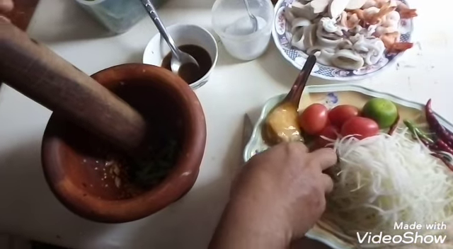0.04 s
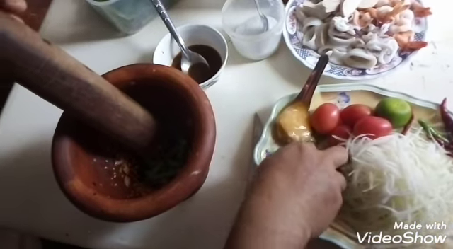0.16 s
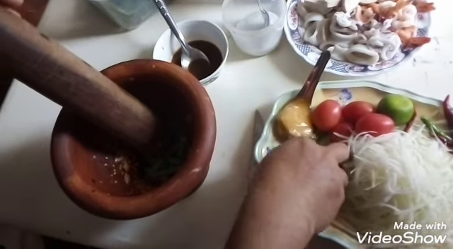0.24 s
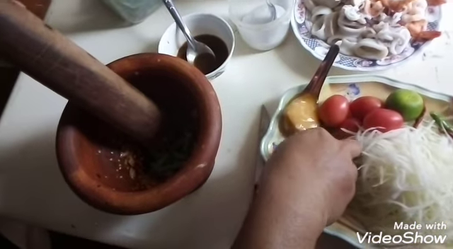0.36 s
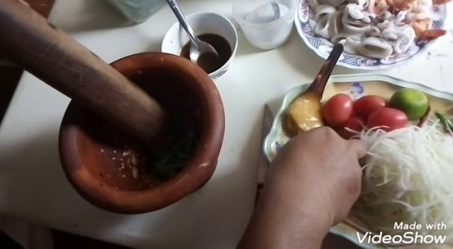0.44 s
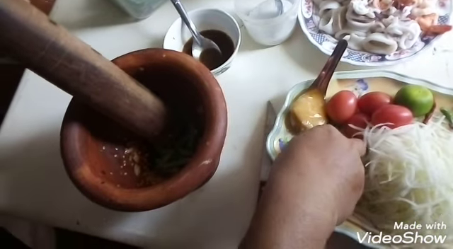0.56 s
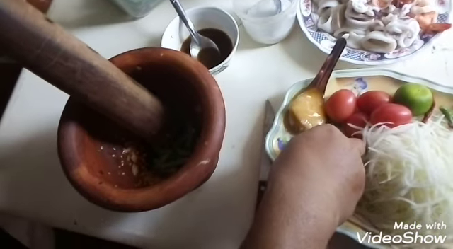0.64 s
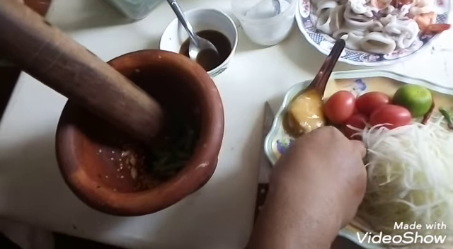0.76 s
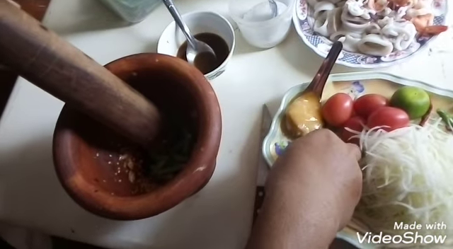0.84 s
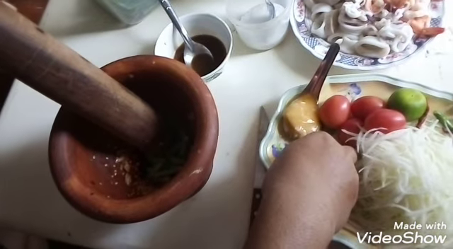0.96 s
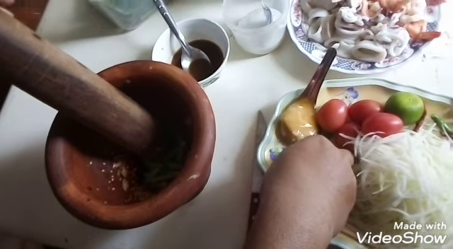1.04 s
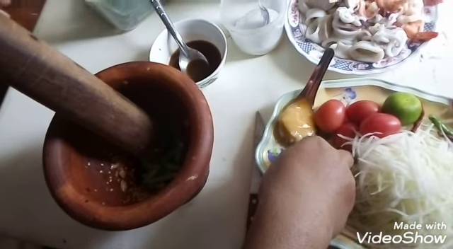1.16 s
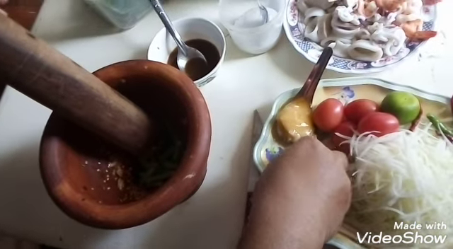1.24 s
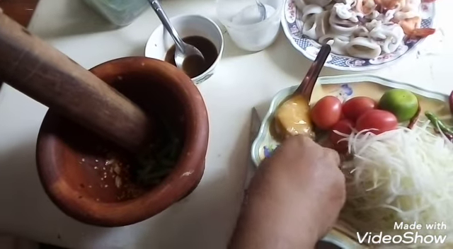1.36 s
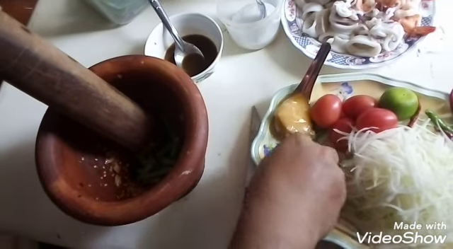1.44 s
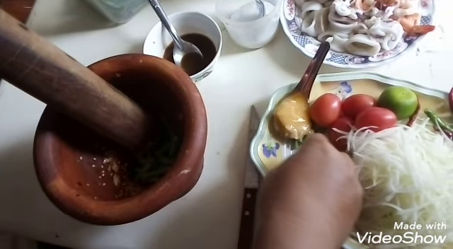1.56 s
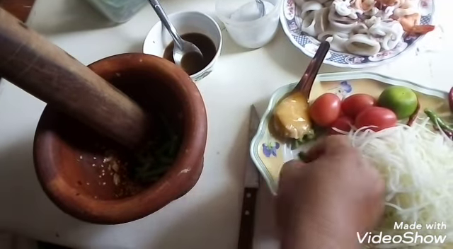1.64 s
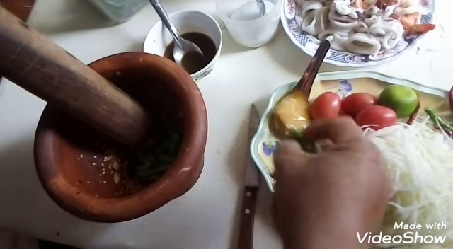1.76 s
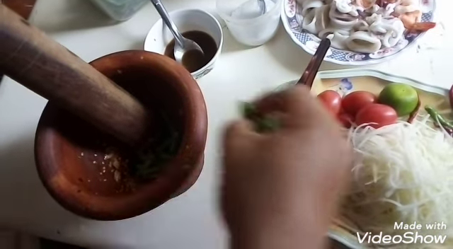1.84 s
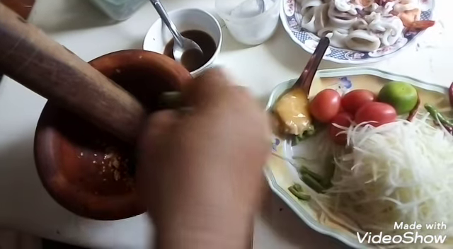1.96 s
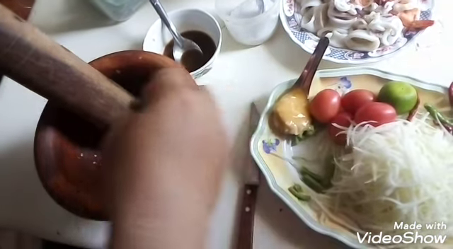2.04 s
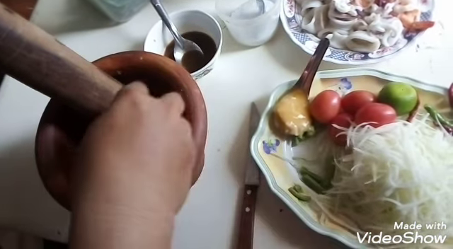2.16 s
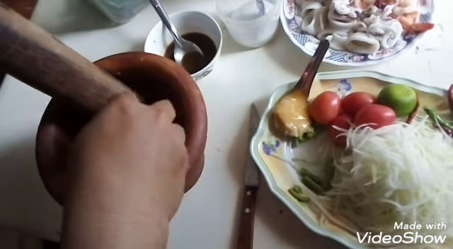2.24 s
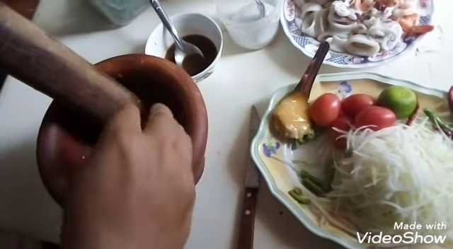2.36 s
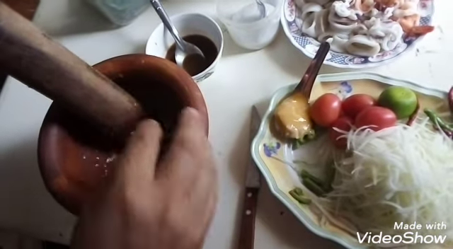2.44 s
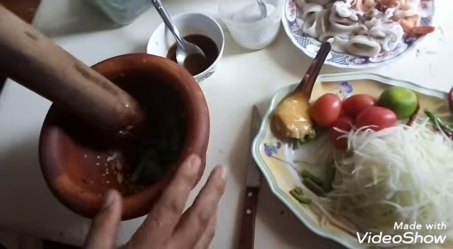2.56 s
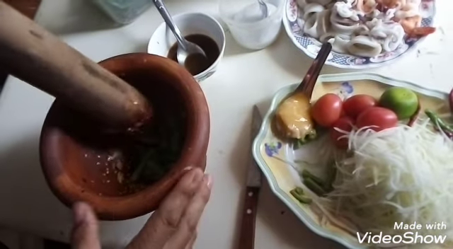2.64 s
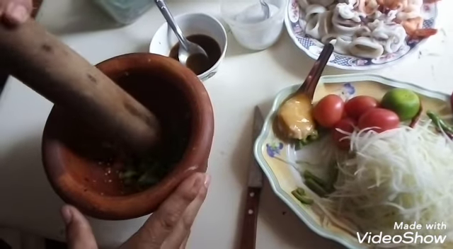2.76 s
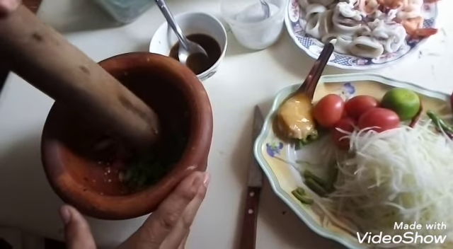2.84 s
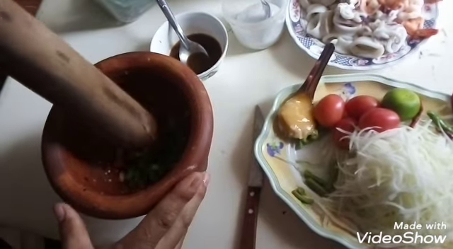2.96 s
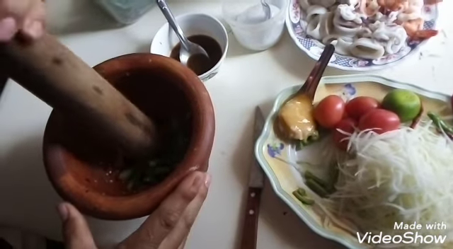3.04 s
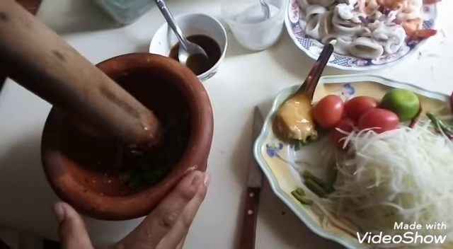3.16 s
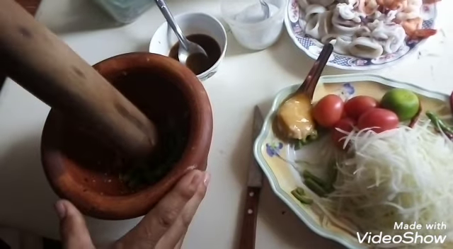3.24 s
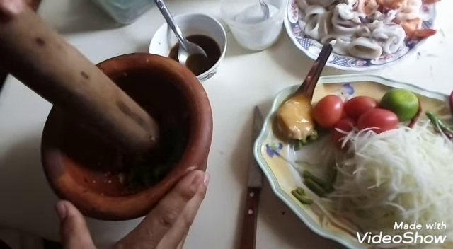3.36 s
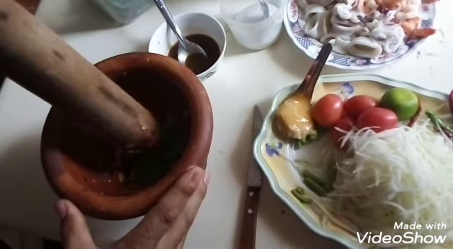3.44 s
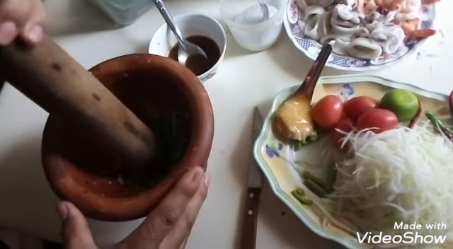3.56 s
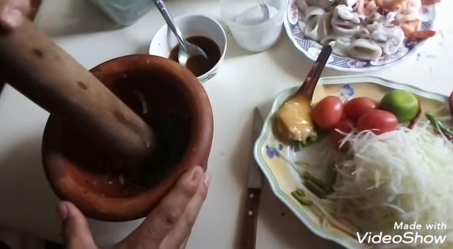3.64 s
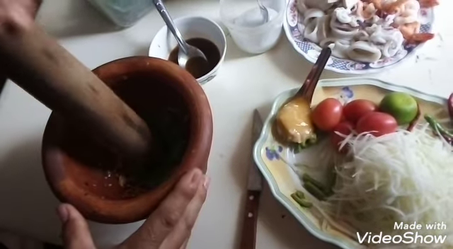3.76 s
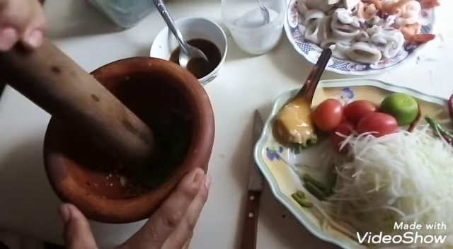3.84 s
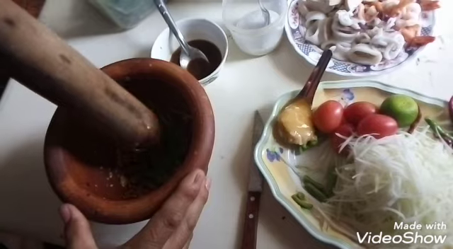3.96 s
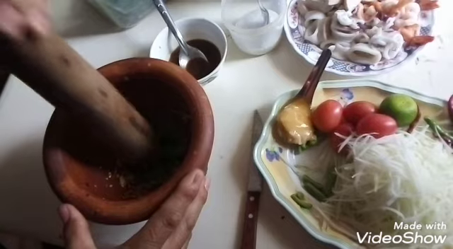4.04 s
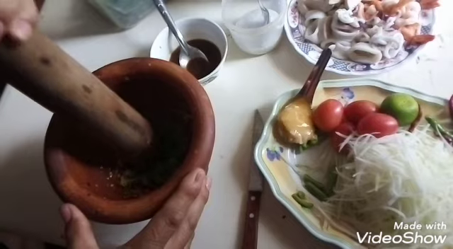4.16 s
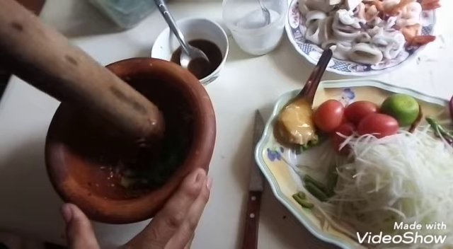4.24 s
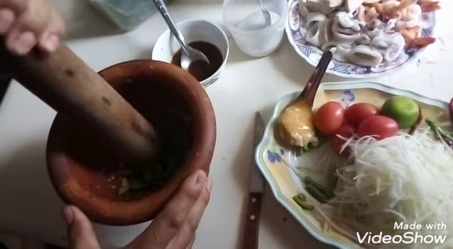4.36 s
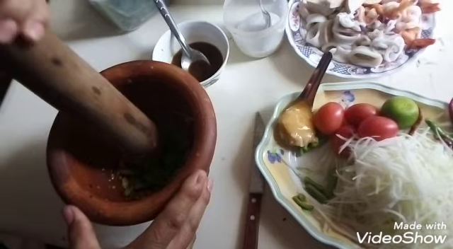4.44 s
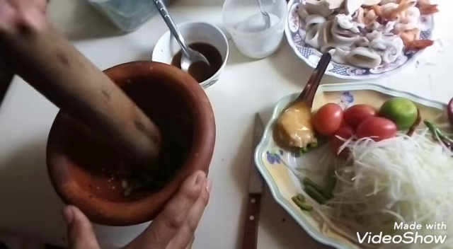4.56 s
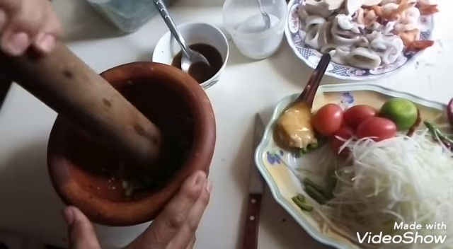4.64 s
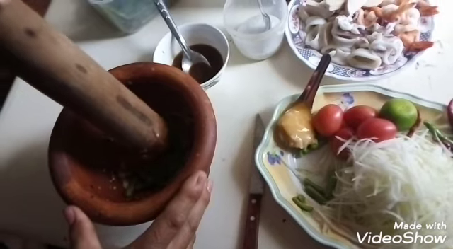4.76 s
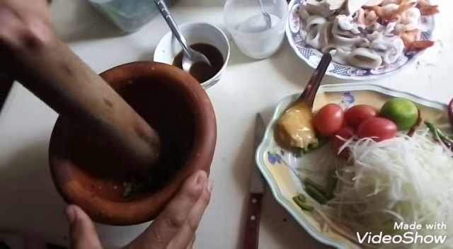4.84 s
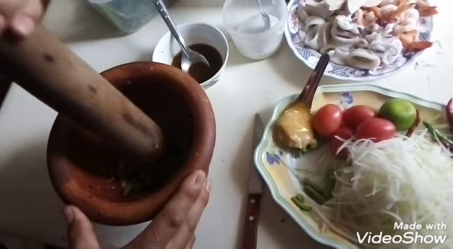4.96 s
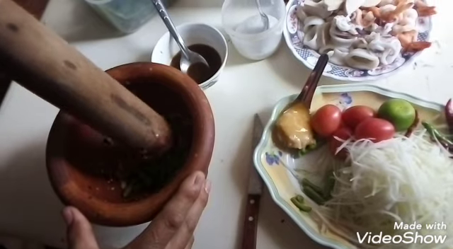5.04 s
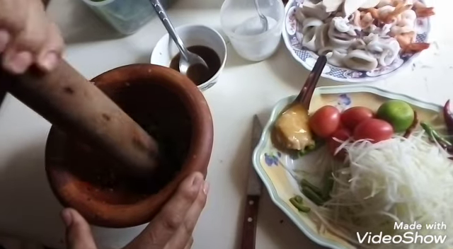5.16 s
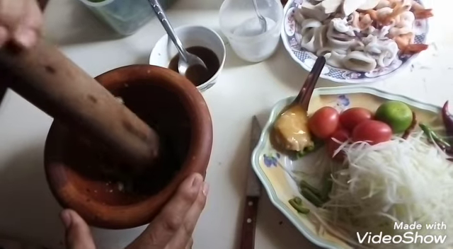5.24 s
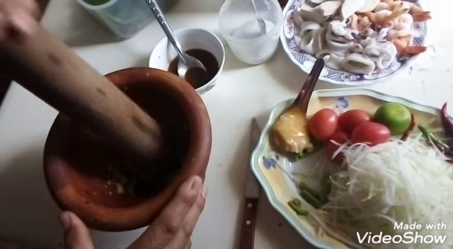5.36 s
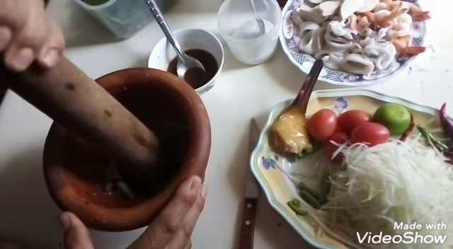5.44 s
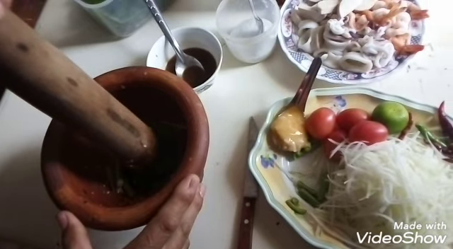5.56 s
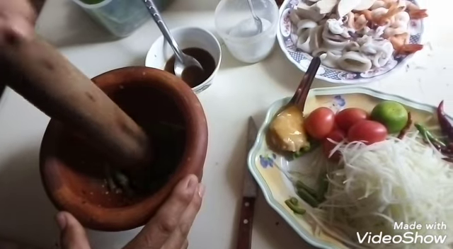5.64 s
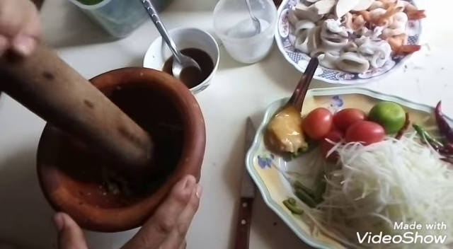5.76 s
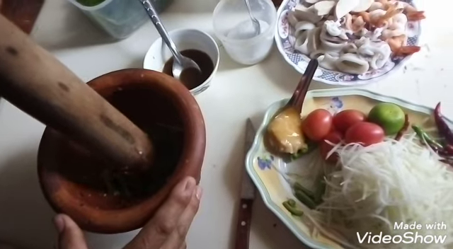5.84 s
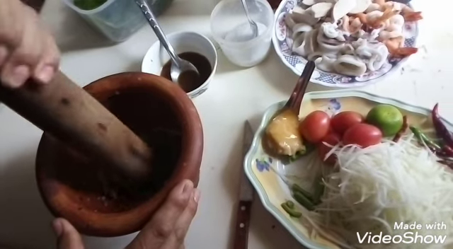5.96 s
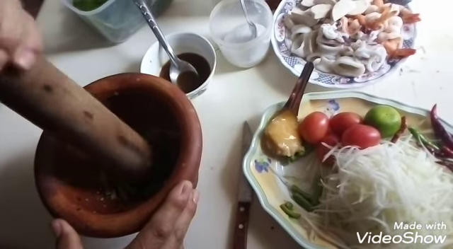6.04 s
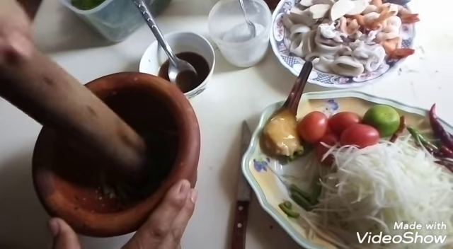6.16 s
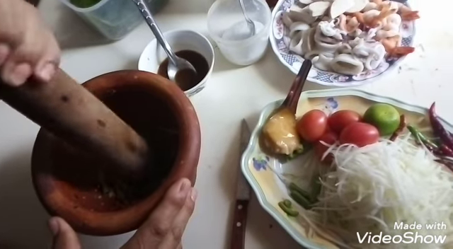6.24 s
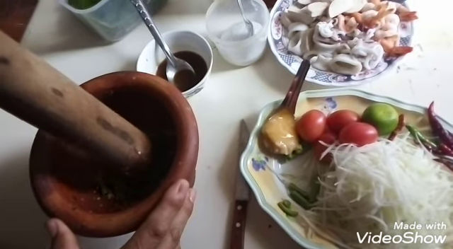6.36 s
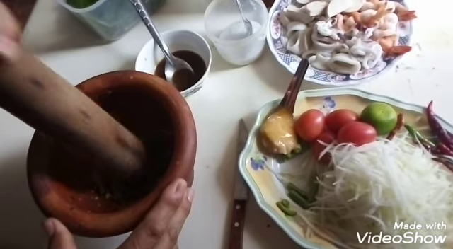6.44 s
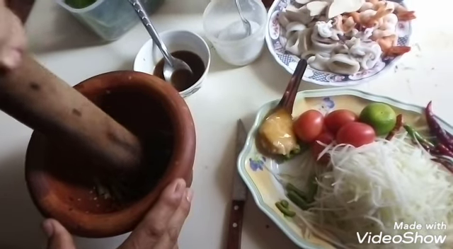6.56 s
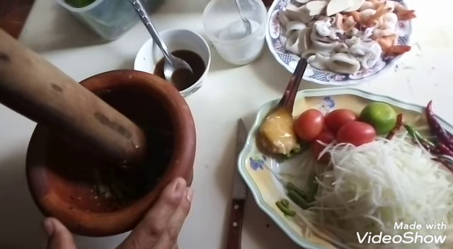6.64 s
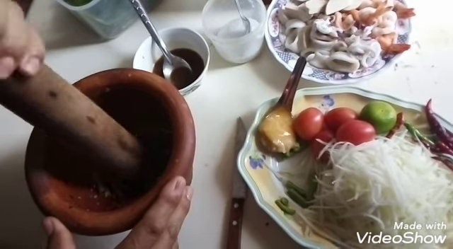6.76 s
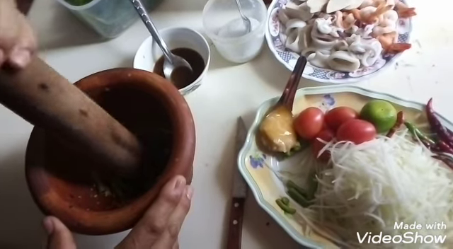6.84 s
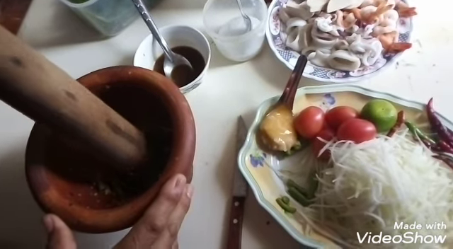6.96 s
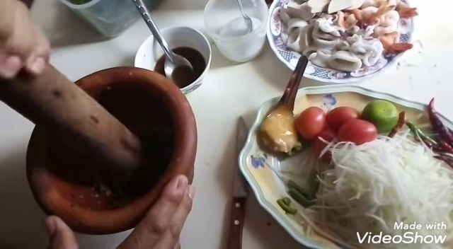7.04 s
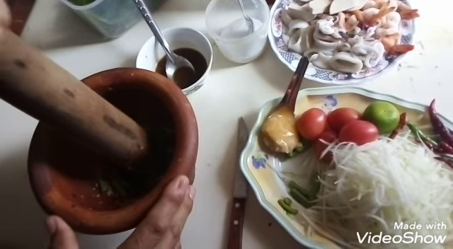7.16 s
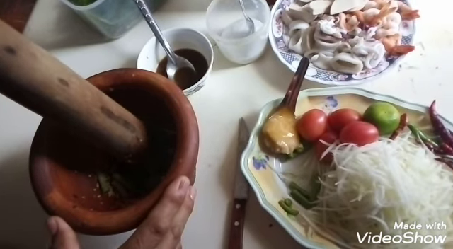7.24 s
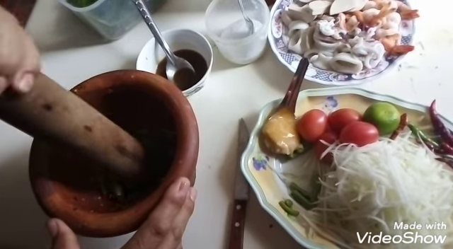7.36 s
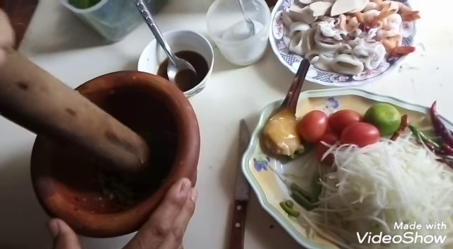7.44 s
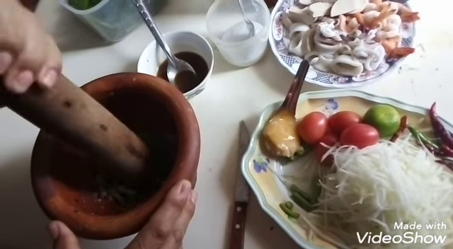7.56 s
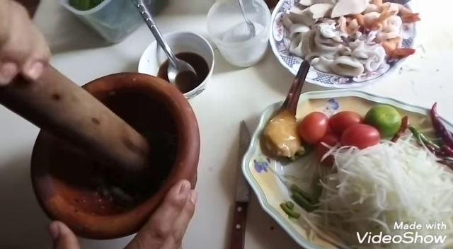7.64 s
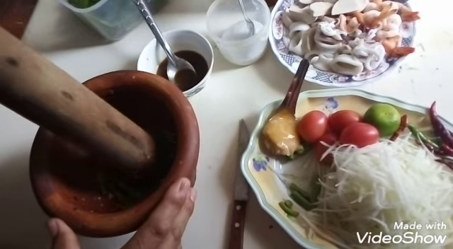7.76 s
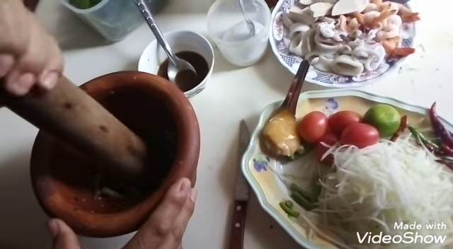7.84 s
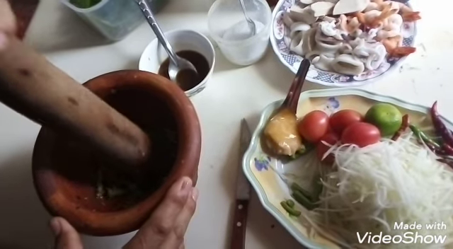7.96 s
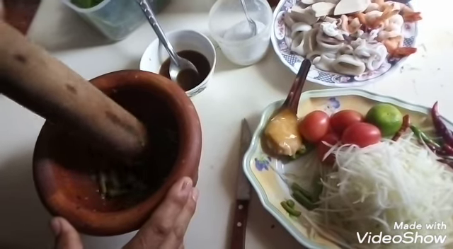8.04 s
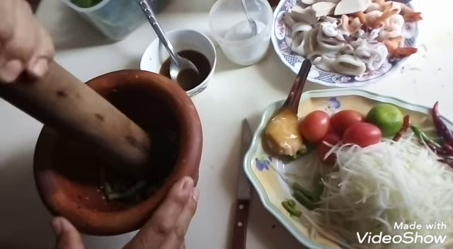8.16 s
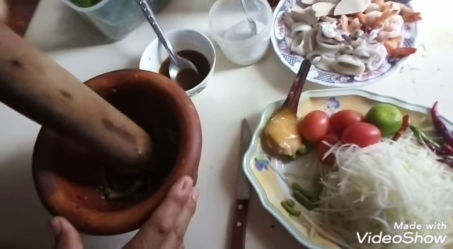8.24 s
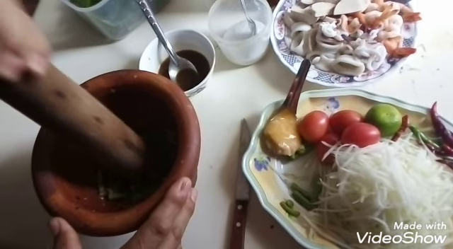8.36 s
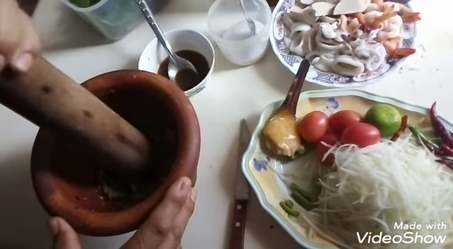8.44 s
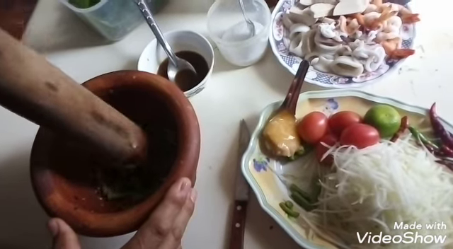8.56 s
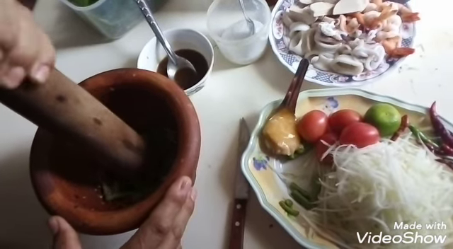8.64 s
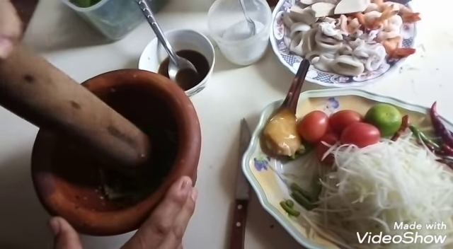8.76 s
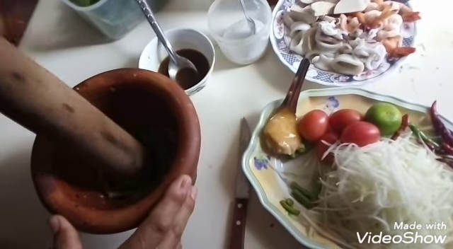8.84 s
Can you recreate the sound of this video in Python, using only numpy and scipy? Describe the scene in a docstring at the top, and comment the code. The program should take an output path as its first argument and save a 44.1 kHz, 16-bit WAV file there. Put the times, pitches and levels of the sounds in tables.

```python
"""Pestle and clay mortar.

A wooden pestle pounds chillies and beans on a kitchen table. The skins snap, the pulp gives way with a
thud, and some 60 ms later the pestle knocks on bare clay and skids on; hard strokes bounce against the
bowl's wall. Before the pounding a hand picks beans from a plate. A fan buzzes and flutters in the
small, hard-walled room and a distant motor winds up."""
import sys
import numpy as np
from scipy import signal
from scipy.fft import rfft, irfft
from scipy.io import wavfile

SR = 44100
rng = np.random.default_rng(int(sys.argv[2]) if len(sys.argv) > 2 else 0)


def file_out(sig):
    """Save sig as 16-bit WAV at sys.argv[1]."""
    # one column per channel
    cols = np.atleast_2d(sig).T
    # limit, then scale
    lim = np.clip(cols, -1, 1)
    pcm = np.round(lim * 32767).astype(np.int16)
    wavfile.write(sys.argv[1], SR, pcm)


N = 392931
TIME_S = np.arange(N) / SR


def from_db(db):
    """Decibels to gain."""
    return 10 ** (np.asarray(db) / 20)


def unit_energy(x):
    """Scale so that the squares sum to one."""
    return x / np.sqrt(np.sum(x ** 2) + 1e-20)


def at_hz(points, hz):
    """Read a table on a log-frequency axis."""
    return np.interp(np.log(np.maximum(hz, 1)), *np.transpose([(np.log(f), v) for f, v in points]))


def over_time(points):
    """Read a (time, value) table at every sample."""
    return np.interp(TIME_S, *np.transpose(points))


def add(track, start_s, sound):
    """Mix a short sound in at a time."""
    i = max(round(start_s * SR), 0)
    track[i:i + len(sound)] += sound[:N - i]


def convolve(x, response):
    """Pass a sound through an impulse response."""
    return signal.fftconvolve(x, response)[:len(x)]


def colour(spectrum, size=4096):
    """Minimum-phase impulse response with this spectrum."""
    cepstrum = irfft(np.log(from_db(at_hz(spectrum, np.arange(size // 2 + 1) * SR / size))))
    cepstrum[1:size // 2] *= 2
    cepstrum[size // 2 + 1:] = 0
    return unit_energy(irfft(np.exp(rfft(cepstrum))))


def noise(spectrum):
    """Steady coloured noise, rms 1."""
    response = colour(spectrum)
    return signal.fftconvolve(rng.standard_normal(N + len(response) - 1), response, "valid")


def ringing(modes):
    """One second of decaying modes; a mode's level sets its energy."""
    t = np.arange(SR) / SR
    return unit_energy(sum(from_db(db) * unit_energy(np.cos(2 * np.pi * hz * t) * from_db(-60 * t / t60))
                           for hz, db, t60 in modes))


def wavering(depth_db, step_s):
    """A level in dB that wanders at random."""
    return depth_db * np.interp(TIME_S / step_s, np.arange(1024), rng.standard_normal(1024))


def swell(t, lead_s, rise_s, fall_s):
    """Envelope: sets in abruptly as surfaces touch, crests at t = 0, dies away."""
    return (t > -lead_s) * np.exp(np.minimum(t / rise_s, -t / fall_s))


def grains(envelope, per_s, spread_db):
    """Tiny fractures and slips of uneven size under an envelope; energy 1."""
    chance, size, sign = rng.random((3, len(envelope)))
    born = chance < per_s / SR
    return unit_energy(envelope * born * from_db(spread_db * size) * np.sign(sign - .5))


def varying(x, make_response, strokes_per_s=3.7, count=9):
    """Arm and pestle keep moving: crossfade round a set of responses at the stroke rate."""
    stroke = TIME_S * strokes_per_s
    weights = [np.clip(1 - np.abs((stroke - k + 1) % count - 1), 0, 1) for k in range(count)]
    return sum(convolve(x * weight, make_response()) for weight in weights)


# room decay: (frequency [Hz], t60 [s])
ROOM_DECAY = [(100, 0.27), (300, 0.22), (800, 0.29), (2500, 0.25), (5000, 0.21), (9000, 0.11),
              (16000, 0.067)]


def kitchen(wet_db, build_s=0.00006, late_db=-25, late_t60_s=0.46, bands=12):
    """Room response: direct sound, dense reflections dying band by band, a faint long tail."""
    t = np.arange(SR) / SR
    white, hz = rfft(rng.standard_normal(SR)), np.arange(SR // 2 + 1)
    centres_hz = np.geomspace(60, 16000, bands)
    onset = 1 - np.exp(-t / build_s)
    tail = 0
    for k, centre_hz in enumerate(centres_hz):
        band = at_hz(zip(centres_hz, np.eye(bands)[k]), hz)
        fade = from_db(-60 * t / at_hz(ROOM_DECAY, centre_hz)) + from_db(late_db - 60 * t / late_t60_s)
        tail += unit_energy(irfft(white * band) * fade * onset) * np.sqrt(band.sum())
    response = from_db(wet_db) * unit_energy(tail)
    response[0] += 1
    return response / np.sqrt(1 + from_db(2 * wet_db))


def in_room(x, wet_db):
    """Successive strokes reach the walls by different paths."""
    return varying(x, lambda: kitchen(wet_db))


# room air: (frequency [Hz], density [dB])
AIR_SPECTRUM = [(15, -20), (50, 2), (100, 5.5), (400, -2), (600, -6), (1100, -6), (2000, -16.5),
                (2700, -16.5), (4000, -25), (6300, -25), (8500, -39), (16000, -40)]


def air():
    """Still air: a faint, steady, low rush."""
    return from_db(-63) * noise(AIR_SPECTRUM)


# motor hum: (multiple of speed, level [dB])
MOTOR_PARTIALS = [(3, -79), (4, -58.5), (5, -58), (6, -58)]


def motor(start_hz=28.9, top_hz=43.1, wind_up_s=2.2, fade_at_s=0.59, fade_db_per_s=3):
    """A distant motor winds up and fades; each partial wavers on its own."""
    speed_hz = top_hz + (start_hz - top_hz) * np.exp(-TIME_S / wind_up_s)
    angle = 2 * np.pi * np.cumsum(speed_hz) / SR
    fade_db = -fade_db_per_s * np.maximum(TIME_S - fade_at_s, 0)
    return sum(np.sqrt(2) * from_db(db + fade_db + wavering(depth_db=3, step_s=0.11)) * np.sin(k * angle)
               for k, db in MOTOR_PARTIALS)


# fan hum: (multiple of turn rate, relative level [dB])
FAN_PARTIALS = [(3, -19), (9, -6.5), (10, -7), (11, -8), (12, -14), (13, -7), (25, -22)]
# fan drone: (frequency [Hz], density [dB])
DRONE_SPECTRUM = [(25, -51), (45, -22), (90, -3), (125, -10), (165, -20.5), (215, 1), (260, -6.5),
                  (320, -22), (365, -34.5), (410, -9.5), (480, -27.5), (800, -80)]
# swell and ebb of the drone: (time [s], level [dB])
DRONE_LEVELS = [(0.0, -61), (0.3, -62.5), (0.7, -55), (0.98, -58), (1.13, -54.5), (1.34, -51.5),
                (2.28, -62), (2.54, -60), (2.95, -61.5)]


def fan_drone(angle, steady_at_s=4, steady_db=-55.5, gain_db=1.5):
    """Hum plus low noise that flutters once a turn; the level swells, ebbs and settles."""
    hum = sum(np.sqrt(2) * from_db(db) * np.sin(k * angle + 2 * np.pi * rng.random())
              for k, db in FAN_PARTIALS)
    flutter = from_db(-1 + 1.7 * np.cos(angle)) * noise(DRONE_SPECTRUM)
    level_db = over_time([*DRONE_LEVELS, (steady_at_s, steady_db)])
    return from_db(level_db + gain_db) * (hum + flutter)


# rattle and the whirr above it: (frequency [Hz], density [dB])
RATTLE_SPECTRUM = [(400, -16), (780, -5), (930, -5.5), (1250, 8), (1430, 17.5), (1520, 8.5), (1730, 18),
                   (1850, 15), (1960, 6.5), (2200, -4), (2700, -4), (2950, -18), (3150, 5), (4000, -27.5),
                   (5500, -2), (8500, -88.5)]
WHIRR_SPECTRUM = [(1800, -32.5), (2300, 5.5), (2520, -3.5), (2700, 5), (2900, -6), (3400, -26.5),
                  (4000, -35.5)]
# swell and ebb of both: (time [s], level [dB])
RATTLE_LEVELS = [(0.0, -69), (0.5, -67), (0.95, -70.5), (1.25, -65.5), (1.65, -64.5), (1.95, -67.5),
                 (2.1, -70.5), (2.6, -72.5), (2.95, -79), (5.2, -70)]


def fan_rattle(angle, turn_hz, throb_db=4.3, waver_db=2.2, waver_s=.05, noise_db=-1, whirr_db=-4.5):
    """A loose part chatters much alike on every turn, throbbing unevenly; a thin whirr follows it."""
    throb = from_db(throb_db * np.cos(angle) + wavering(waver_db, waver_s))
    one_turn = grains(np.ones(round(SR / turn_hz)), per_s=700, spread_db=10)
    chatter = np.sqrt(N) * unit_energy(convolve(np.resize(one_turn, N), colour(RATTLE_SPECTRUM)))
    buzz = np.sqrt(N) * unit_energy(chatter + from_db(noise_db) * noise(RATTLE_SPECTRUM))
    whirr = from_db(whirr_db + wavering(waver_db, waver_s)) * noise(WHIRR_SPECTRUM)
    return from_db(over_time(RATTLE_LEVELS)) * (throb * buzz + whirr)


def fan(turn_hz=16.1, first_turn_s=0.037):
    """One rotation drives both drone and rattle."""
    angle = 2 * np.pi * turn_hz * (TIME_S - first_turn_s)
    return fan_drone(angle) + fan_rattle(angle, turn_hz)


def contact_levels(db, law, thud_db=0, dull_db=0, drag_db=0):
    """Thud, dull, crisp and drag levels in dB: each follows the strength at its own slope."""
    usual_db, parts = law
    levels_db = [part_db + slope * (db - usual_db) for part_db, slope in parts]
    return np.add(levels_db, (thud_db, dull_db, 0, drag_db))


def contact_forces(rows, *, push_s, yield_s, per_s, spread_db, crest_s, bite_lead_s, bite_rise_s,
                   bite_fall_s, drag_at_s, drag_lead_s, drag_rise_s, drag_fall_s,
                   push_lead_s=0, dull_lag_s=0, keen_db=-19):
    """Push, dull and crisp forces: a soft pulse and a gritty bite, with a drag around or after it."""
    push, dull, crisp = np.zeros((3, N))
    lead_s = .05
    t = np.arange(SR // 4) / SR - lead_s
    age_s = np.maximum(t + push_lead_s, 0)
    pulse = age_s ** 2 * np.exp(-age_s / push_s)
    drag_shape = swell(t - drag_at_s, drag_lead_s, drag_rise_s, drag_fall_s)
    bite_shape = swell(t - crest_s, bite_lead_s, bite_rise_s, bite_fall_s)
    # the dull part builds as the pestle sinks in and lasts while the pulp yields
    crush_shape = swell(t - crest_s - dull_lag_s, bite_lead_s + dull_lag_s,
                        bite_rise_s + dull_lag_s / 2, yield_s)
    for s, thud_db, dull_db, crisp_db, drag_db in rows:
        drag = from_db(drag_db) * grains(drag_shape, per_s / 2, spread_db)
        bite = grains(bite_shape, per_s, spread_db) + drag
        crush = grains(crush_shape, per_s, spread_db) + drag
        # harder contacts have keener edges: more treble
        edge = from_db(crisp_db - keen_db) * np.convolve(bite, [-1, 2, -1], "same")
        add(push, s - lead_s, from_db(thud_db) * pulse / pulse.sum())
        add(dull, s - lead_s, from_db(dull_db) * crush)
        add(crisp, s - lead_s, from_db(crisp_db) * (bite + edge))
    return push, dull, crisp


# table top: (frequency [Hz], level [dB], t60 [s])
TABLE_TOP_MODES = [(89.5, -4.5, 0.35), (118.4, -2.5, 0.21), (135.3, -1.5, 0.08), (186.5, 5, 0.094),
                   (237.3, 1.5, 0.11), (313, -10.5, 0.04), (339.4, -7, 0.35), (490, -7, 0.04),
                   (581, 2, 0.15), (680, -3, 0.06)]


def radiate(forces, dull_response, crisp_response, thud_db, dull_db, crisp_db, bass_cut_hz=80.4):
    """Thud and clack: the push shakes the table, weak in deep bass; the grit excites two responses."""
    push, dull, crisp = forces
    shaking = convolve(push, ringing(TABLE_TOP_MODES))
    thud = signal.sosfilt(signal.butter(3, bass_cut_hz, "high", fs=SR, output="sos"), shaking)
    knock = from_db(dull_db) * convolve(dull, dull_response)
    grit = from_db(crisp_db) * convolve(crisp, crisp_response)
    return from_db(thud_db) * thud, knock + grit


# hollow bump on plate and mortar: (frequency [Hz], level [dB], t60 [s])
HOLLOW_MODES = [(244, 3.5, 0.072), (622, 0, 0.044), (716, -12, 0.031), (775, -1, 0.024), (1020, -7, 0.013)]
# beans rubbing: (frequency [Hz], density [dB])
RUSTLE_SPECTRUM = [(500, -6), (1100, 0.5), (1600, -3), (2300, 3.5), (2950, -18), (3400, -12), (4200, -22),
                   (9000, -38)]
# fingers on plate and rim: (time [s], bump [dB], rustle [dB], thud [dB])
FINGER_TOUCHES = [(0.174, -53.5, -61.5, -76), (0.435, -54, -64, -76), (0.459, -53, -73, -69),
                  (0.78, -56.5, -64.5, -66), (1.149, -63, -75, -55), (1.2, -59, -69, -73),
                  (1.291, -70, -66, -76), (1.365, -66, -65, -76), (1.868, -73, -62, -76),
                  (2.388, -47, -81, -44), (5.862, -56, -74, -45.5), (8.209, -55.5, -59.5, -41.5),
                  (8.296, -63, -82, -68.5)]


def hand(flesh_hz=950, drag_db=-10):
    """Fingers, too soft to tick, bump the hollow modes and stir the beans."""
    rows = [(s, thud_db, bump_db, rustle_db, drag_db)
            for s, bump_db, rustle_db, thud_db in FINGER_TOUCHES]
    forces = contact_forces(
        rows, push_s=.0005, yield_s=.007, per_s=3000, spread_db=8,
        crest_s=.002, bite_lead_s=.006, bite_rise_s=.002, bite_fall_s=.008,
        drag_at_s=.02, drag_lead_s=.04, drag_rise_s=.025, drag_fall_s=.02)
    bump = signal.sosfilt(signal.butter(2, flesh_hz, fs=SR, output="sos"), ringing(HOLLOW_MODES))
    return radiate(forces, bump, colour(RUSTLE_SPECTRUM), thud_db=38, dull_db=34.5, crisp_db=33.5)


# shreds dragged over clay: (frequency [Hz], density [dB])
SHRED_SPECTRUM = [(150, -2), (500, 12.5), (900, 8.5), (1500, -6.5), (2500, 0.5), (3300, -7), (4200, -20.5),
                  (6500, -9), (9000, -26.5)]
# drags between strokes: (time [s], length [s], level [dB])
SHRED_DRAGS = [(3.693, 0.13, -59.5), (4.344, 0.04, -56), (5.574, 0.1, -81), (5.78, 0.14, -67.5),
               (8.168, 0.29, -65.5)]


def stirring():
    """Shreds catch and slip under the lifted pestle."""
    slips = np.zeros(N)
    t = np.arange(SR // 2) / SR
    for s, length_s, db in SHRED_DRAGS:
        arc = np.sin(np.pi * np.minimum(t / length_s, 1))
        add(slips, s, from_db(db) * np.sqrt(length_s * SR) * grains(arc, per_s=900, spread_db=16))
    return convolve(slips, colour(SHRED_SPECTRUM))


def juice(hits, bubbles=7, low_hz=3500, high_hz=11000, t60_cycles=14, climb_per_s=25,
          gain_db=15, spread_db=5, mean_delay_s=.018):
    """Wet pulp spits after each hit: tiny bubbles ring briefly, each at its own rising pitch."""
    pops = np.zeros(N)
    t = np.arange(SR // 100) / SR
    for s, db in hits:
        for late, pitch, size in rng.random((bubbles, 3)):
            hz = low_hz * (high_hz / low_hz) ** pitch
            pop = np.sin(2 * np.pi * hz * t * (1 + climb_per_s * t)) * from_db(-60 * t * hz / t60_cycles)
            gain = from_db(db + gain_db + spread_db * (2 * size - 4.5)) * low_hz / hz
            add(pops, s - mean_delay_s * np.log(1 - late), gain * unit_energy(pop))
    return pops


# skin contact: usual strength [dB], then (level [dB], slope [dB/dB]) for thud, dull, crisp, drag
SKIN_LAW = -36.5, [(-42, 2), (-48, 1.92), (-38, 1.5), (-2, -0.5)]
# skins and beans snapping, and small wet ticks as the pestle lifts:
# (time [s], strength [dB], creak offset [dB])
SNAPS_AND_TICKS = [(1.868, -57, 5), (2.798, -46, 6), (2.814, -50, 5.5), (3.059, -44.5, -4),
                   (3.073, -38.5, -1), (3.086, -51, -15), (3.21, -61, -31), (3.325, -38.5, 4),
                   (3.57, -39, -10), (3.587, -41, 8.5), (3.841, -38, 1.5), (4.096, -39.5, -15),
                   (4.1, -39, 3.5), (4.114, -36.5, -8), (4.389, -40, 6.5), (4.64, -43, 5), (4.649, -34, -7),
                   (4.906, -36, -32), (4.912, -36, -15), (4.925, -48, 4), (5.183, -34.5, 2.5),
                   (5.453, -40, 6), (5.457, -40, -4), (5.538, -40.5, -10), (5.622, -51.5, -23),
                   (5.714, -43, -2), (5.727, -37, 0.5), (5.774, -43.5, -22), (5.973, -50, -3),
                   (5.988, -34.5, 0.5), (6.257, -38, 4), (6.528, -41, 10), (6.54, -31.5, -17),
                   (6.583, -31.5, -8), (6.799, -32, 0.5), (7.076, -33, -35), (7.082, -48, -17),
                   (7.097, -28.5, -1), (7.106, -29.5, -9.5), (7.345, -42, -3), (7.356, -40.5, 3),
                   (7.374, -35, -8.5), (7.636, -33.5, -2), (7.896, -37, 5.5), (8.153, -40, 3.5),
                   (8.211, -48.5, -9), (8.297, -67, -18.5), (8.407, -48.5, -13), (8.416, -32, -11),
                   (8.676, -36.5, -7), (8.688, -37.5, -4)]


def skin_forces():
    """Skins snap at first touch, some creaking first; the lifting pestle makes small wet ticks."""
    rows = [(s, *contact_levels(db, SKIN_LAW, drag_db=creak_db)) for s, db, creak_db in SNAPS_AND_TICKS]
    return contact_forces(
        rows, push_s=.00061, yield_s=.0099, per_s=4500, spread_db=13,
        crest_s=.00019, bite_lead_s=.00083, bite_rise_s=.0032, bite_fall_s=.0039,
        drag_at_s=.001, drag_lead_s=.026, drag_rise_s=.0073, drag_fall_s=.0037)


# pulp contact: columns as SKIN_LAW
PULP_LAW = -29, [(-32, 1.21), (-40, 1.39), (-66, 2.36), (-4.5, 0.11)]
# pulp giving way: (time [s], squelch [dB], thud [dB])
PULP_CRUSHES = [(3.073, -31, -31.5), (3.334, -32.5, -28), (3.586, -39.5, -27.5), (3.843, -30.5, -27.5),
                (4.111, -30, -23.5), (4.396, -30, -22.5), (4.646, -34, -33), (4.925, -24.5, -25),
                (5.184, -30.5, -20), (5.457, -40, -38), (5.539, -40, -45), (5.73, -41, -28.5),
                (6, -25, -26.5), (6.271, -25, -24), (6.535, -18, -17.5), (6.58, -23, -41),
                (6.802, -30, -28), (7.081, -13.5, -14), (7.097, -21.5, -18.5), (7.375, -30, -23),
                (7.647, -25, -24.5), (7.903, -28, -23.5), (7.946, -26, -37), (8.419, -33, -31.5),
                (8.691, -29.5, -26)]


def pulp_forces():
    """The pestle presses on the pulp and bursts it; a heavy stroke drives through and grates."""
    rows = [(s, *contact_levels(db, PULP_LAW, thud_db=thud_db - db)) for s, db, thud_db in PULP_CRUSHES]
    return contact_forces(
        rows, push_s=.00089, push_lead_s=.00553, yield_s=.005, per_s=3800, spread_db=19.5,
        crest_s=.00078, bite_lead_s=.0025, bite_rise_s=.0022, bite_fall_s=.0012,
        drag_at_s=.0076, drag_lead_s=.016, drag_rise_s=.0046, drag_fall_s=.042)


# food, dull and crisp: (frequency [Hz], density [dB])
SQUELCH_SPECTRUM = [(150, -13), (280, 11.5), (420, -1), (580, 8), (850, 3.5), (1200, 1.5), (1800, 3),
                    (2400, -3), (3200, -7.5), (4500, -17.5), (9000, -40.5)]
CRUNCH_SPECTRUM = [(800, -31.5), (2000, 8.5), (3000, 5.5), (4200, 4), (5500, 10), (6800, 3.5), (8200, -8),
                   (10000, -14.5), (13000, -21.5), (15000, -14)]


def pestle_on_food():
    """Skins and pulp thud, squelch and crunch under the pestle."""
    forces = np.add(skin_forces(), pulp_forces())
    return radiate(forces, colour(SQUELCH_SPECTRUM), colour(CRUNCH_SPECTRUM),
                   thud_db=37.5, dull_db=30.5, crisp_db=27.5)


# wood on clay, dull and crisp: (frequency [Hz], density [dB])
KNOCK_SPECTRUM = [(150, -7.5), (265, 1), (420, -5.5), (490, -4), (575, -0.5), (680, 1), (850, -0.5),
                  (1200, 1), (1600, -0.5), (2400, 0), (3200, -12.5), (4500, -12), (9000, -79)]
GRIT_SPECTRUM = [(800, -61.5), (2000, 2.5), (3000, 7), (3700, 5.5), (4250, -0.5), (4700, 5), (5050, 1),
                 (5500, 3.5), (6200, -1), (7000, 0), (8000, -7), (8750, -9), (9400, -10), (10300, -10.5),
                 (11200, -20), (13600, -23), (14600, -22.5), (16000, -14)]
# clay contact: columns as SKIN_LAW
CLAY_LAW = -29.5, [(-24.5, 0.77), (-29.5, 1.096), (-27.5, 1.4), (1.5, 0.21)]
# knocks: (time [s], strength [dB], thud and dull offset [dB], skid offset [dB], bowl ring [dB])
CLAY_KNOCKS = [(3.121, -41, -4.5, -11, 0), (3.383, -33, 3, -8, -13), (3.637, -40, 1, -34, -9),
               (3.9, -35.5, 2.5, -10.5, -5), (4.16, -35.5, 2, -18.5, -3), (4.446, -31, -2.5, -12.5, -14),
               (4.702, -34, 1.5, -34, -9), (4.973, -30.5, 2, -13, -13), (5.243, -32.5, -1, -9, -13),
               (5.51, -46.5, 8.5, -32, -19), (5.777, -56.5, 10, -30, -20), (6.049, -29.5, 3.5, -13, -9.5),
               (6.319, -30, 2.5, -16, -10), (6.591, -29, 3.5, -13, -3), (6.858, -29.5, 0, -15.5, -2),
               (7.139, -28, 2.5, -6.5, -12), (7.695, -31, 3, -8.5, -0.5), (7.955, -29.5, 2.5, -12.5, -12.5),
               (8.476, -31.5, 2.5, -9.5, -9), (8.745, -29.5, 1.5, -10, -11)]


def pestle_on_clay():
    """A stroke ends on bare clay and skids on; harder knocks are brighter."""
    rows = [(s, *contact_levels(db, CLAY_LAW, thud_db=low_db, dull_db=low_db, drag_db=skid_db))
            for s, db, low_db, skid_db, _ in CLAY_KNOCKS]
    forces = contact_forces(
        rows, push_s=.00054, yield_s=.0069, dull_lag_s=.0028, per_s=3600, spread_db=11.5,
        crest_s=.00068, bite_lead_s=.0063, bite_rise_s=.0024, bite_fall_s=.01,
        drag_at_s=.035, drag_lead_s=.09, drag_rise_s=.042, drag_fall_s=.012)
    return radiate(forces, colour(KNOCK_SPECTRUM), colour(GRIT_SPECTRUM),
                   thud_db=35.5, dull_db=32.5, crisp_db=31.5)


# wall contact: columns as SKIN_LAW
WALL_LAW = -31.5, [(-46.5, 1), (-35, 1), (-29, 0.88), (-8, 0.1)]
# bounces: (time [s], strength [dB])
WALL_BOUNCES = [(4.481, -38), (6.089, -35.5), (6.362, -33.5), (6.394, -37.5), (6.638, -30.5),
                (6.663, -38.5), (6.69, -41), (7.178, -34), (7.21, -36), (7.737, -35), (7.994, -31.5),
                (8.514, -33.5), (8.788, -40.5)]


def pestle_on_wall():
    """Hard strokes bounce and crack against the bowl's side; glancing blows hardly shake the table."""
    rows = [(s, *contact_levels(db, WALL_LAW)) for s, db in WALL_BOUNCES]
    forces = contact_forces(
        rows, push_s=.00078, yield_s=.0041, per_s=3000, spread_db=18.5,
        crest_s=.00041, bite_lead_s=.0095, bite_rise_s=.0095, bite_fall_s=.0018,
        drag_at_s=.0099, drag_lead_s=.008, drag_rise_s=.0022, drag_fall_s=.0067)
    return radiate(forces, colour(KNOCK_SPECTRUM), colour(GRIT_SPECTRUM),
                   thud_db=31.5, dull_db=29, crisp_db=30.5)


# mortar and pestle, damped by the hands: (frequency [Hz], level [dB], t60 [s])
BOWL_MODES = [(578, 3, .14), (670, -1, .07), (1183, -6, .1), (1315, -7, .08), (1735, -9, .06),
              (2215, -2, .09), (2310, 0, .12), (2410, 0, .12), (2503, -3, .1), (2712, -2, .09),
              (3150, -13, .08), (3515, -6, .08), (3662, -5, .08), (4638, 8, .2), (4698, 4, .17),
              (4753, 6.5, .19), (5560, -8, .05), (7296, 5, .18), (7690, -9, .25), (8330, -7, .06),
              (9400, -5, .09), (9770, -6, .09), (10120, -5, .06), (10390, -6, .06)]


def struck_bowl(spot_db=2, grip_detune=0.00098):
    """Each spot on the clay favours other modes; the grip shifts them a little."""
    chance = rng.standard_normal((len(BOWL_MODES), 2))
    return ringing([(hz * (1 + grip_detune * grip), db + spot_db * spot, t60)
                    for (hz, db, t60), (grip, spot) in zip(BOWL_MODES, chance)])


def mortar(blows):
    """The clay bowl rings on, more or less freely from stroke to stroke."""
    ring_db = over_time([(s, db) for s, *_, db in CLAY_KNOCKS])
    return from_db(ring_db) * varying(blows, struck_bowl)


def scene():
    """Strokes and touches sound through the room, over fan, far motor and air."""
    food_thud, crunch = pestle_on_food()
    clay_thud, clack = pestle_on_clay()
    wall_thud, crack = pestle_on_wall()
    hand_thud, rustle = hand()
    # food damps the bowl; bare clay rings freely, its wall most of all
    ring = mortar(from_db(-28) * crunch + from_db(-10.5) * clack + from_db(-5) * crack)
    wet_hits = [(s, db) for s, db, *_ in CLAY_KNOCKS] + [(s, db - 7) for s, db, _ in PULP_CRUSHES]
    food = crunch + juice(wet_hits)
    clatter = in_room(from_db(-2) * food + clack + crack + ring + rustle + stirring(), wet_db=0)
    thuds = in_room(food_thud + clay_thud + wall_thud + hand_thud, wet_db=-0.5)
    direct = from_db(-12.5) * food  # the food lies open to the listener
    return (direct + clatter + thuds + fan() + motor() + air())[None]


def record(dry, cutoff_hz=15700):
    """Steep low-pass on the top treble."""
    return signal.sosfilt(signal.ellip(10, .2, 80, cutoff_hz, fs=SR, output="sos"), dry)


dry = scene()
out = record(dry)
file_out(out)
```